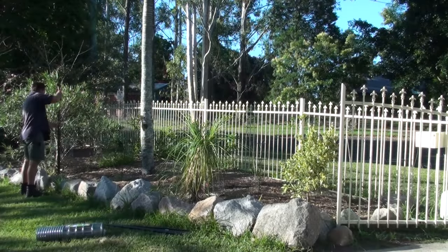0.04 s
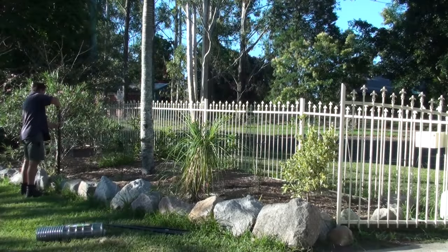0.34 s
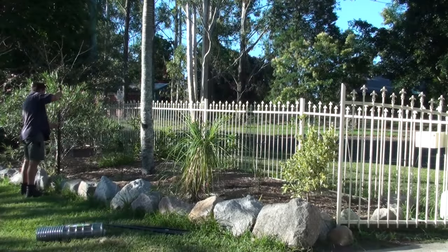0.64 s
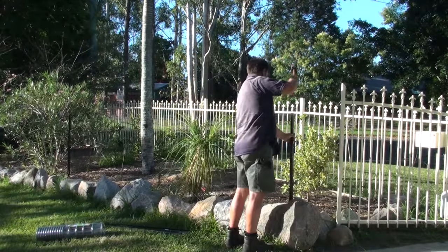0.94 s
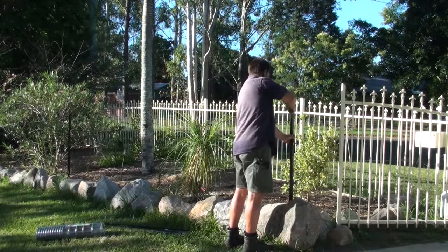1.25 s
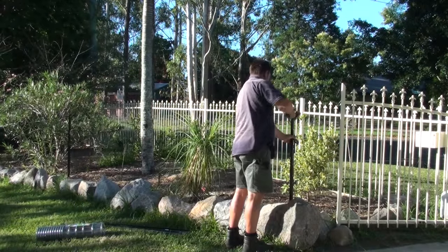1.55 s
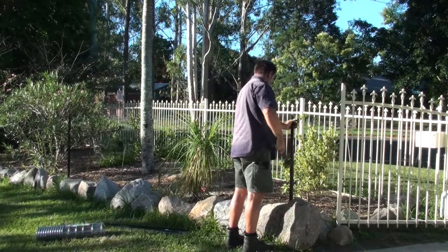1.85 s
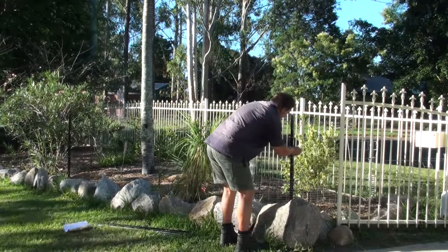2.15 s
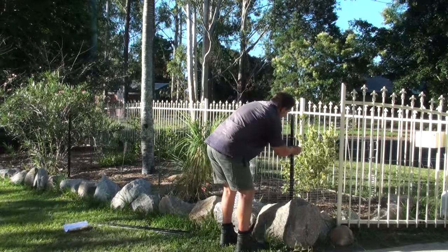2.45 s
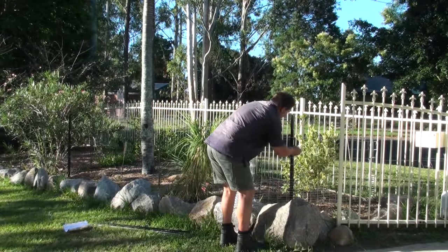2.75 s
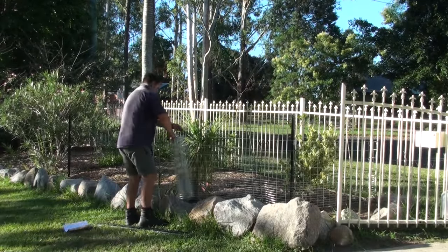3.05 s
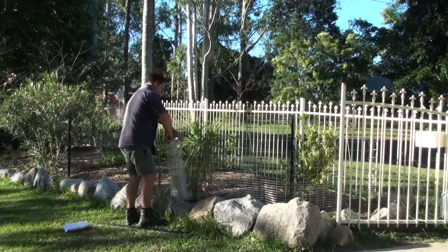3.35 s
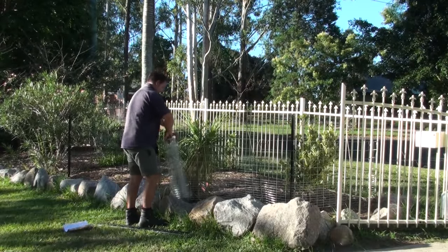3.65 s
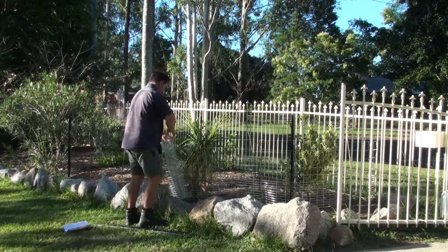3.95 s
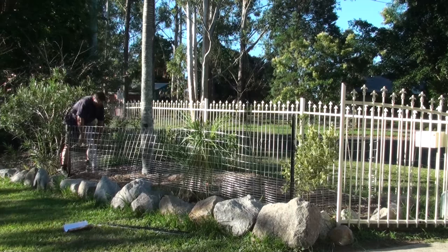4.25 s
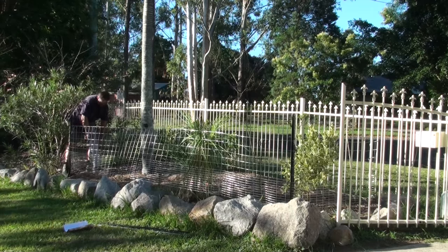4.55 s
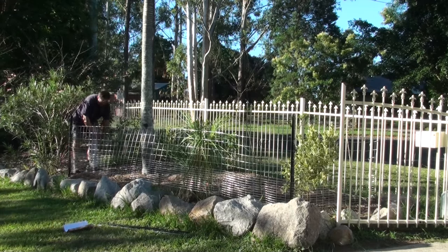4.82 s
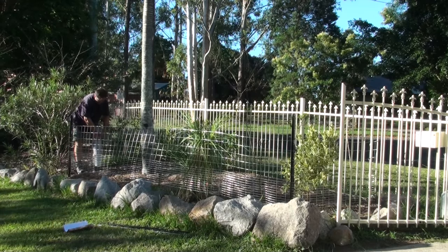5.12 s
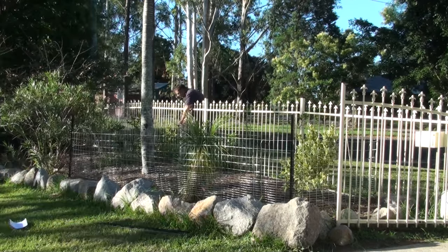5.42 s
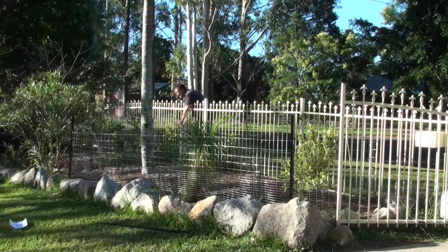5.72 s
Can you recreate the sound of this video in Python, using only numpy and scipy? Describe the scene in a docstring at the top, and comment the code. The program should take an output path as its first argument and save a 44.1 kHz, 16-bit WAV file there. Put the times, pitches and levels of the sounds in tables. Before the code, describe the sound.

A high, shrill insect buzz runs throughout in an open garden, over a soft hiss of distant leaves. After a dull scuff on the right, a far steel post takes one clanging blow at about 0.3 seconds. At 1.3 seconds a nearer post takes a louder blow, with a short ring, an echo and soft ground thuds. The buzz jumps louder near 1.9 seconds and shifts abruptly again around 2.9, 4.3 and 5.3 seconds. Faint birds call from the right, with whistles near 0.8 seconds and from 2.2 to 2.9, hoarse screeches around 3.3, and small twitters later. Between 3.8 and 5.3 seconds, wire mesh is unrolled in about five short, grainy swishes, the sharpest near 4.1. A breeze rumbles on the microphone from about 3.5 to 4.6 seconds, with low bumps that are strongest near 4.1 and 5.2 seconds.

```python
"""Two steel fence posts each take one clanging blow: impact excites their modes, the soil damps them,
and trees and railings scatter the sound back. The ground thuds after the near blow. Later, wire mesh
swishes by friction as it is unrolled. Insects buzz throughout, their level stepping between six short
garden scenes. Birds whistle and screech, distant leaves hiss, and a breeze bumps the microphone."""
import sys
import numpy as np
from scipy import signal
from scipy.fft import rfft, irfft, next_fast_len
from scipy.io import wavfile
from scipy.ndimage import map_coordinates

SR = 44100
rng = np.random.default_rng(int(sys.argv[2]) if len(sys.argv) > 2 else 0)


def to_wav(sig):
    """Store sig (one row per channel, or 1-D mono) as 16-bit WAV at the path in sys.argv[1].

    Samples outside -1..1 are clipped; the rate is SR.
    """
    pcm = np.clip(np.atleast_2d(sig), -1, 1) * 32767
    pcm = np.round(pcm).astype(np.int16)
    wavfile.write(sys.argv[1], SR, pcm.T)  # frames by channels


N = 259238

# steady levels of each scene: (start [s], far chorus [dB], nearby insects [dB], open air [dB])
SCENE_LEVELS = [(0, -39, -60, -43.5), (.823, -41.5, -64, -46.5), (1.943, -33.5, -29.5, -47),
                (2.876, -34.5, -27, -44.5), (4.261, -34.5, -34, -46), (5.265, -51, -28.5, -46)]
# diffuse field: (frequency [Hz], side minus mid [dB])
DIFFUSE_WIDTH = [(200, -5), (1000, -2), (2500, -2.5), (4500, 1), (7000, 0), (10000, -2.5)]
# reverberation of the garden: (frequency [Hz], time to fall 60 dB [s])
GARDEN_T60 = [(200, 0.42), (1500, 1), (3200, 0.87), (6000, 0.75), (10000, 0.58), (15000, 0.35)]
# noise spectra: (frequency [Hz], relative spectral density [dB])
AIR_SPECTRUM = [(20, -35), (60, -6), (150, -3.5), (400, -4), (800, -4), (1500, -5.5), (3000, -4.5),
                (5500, -10), (10000, -14), (12000, -21.5), (15000, -78)]
BREEZE_SPECTRUM = [(20, -6), (45, 0), (90, 0), (160, -4.5), (260, -14), (500, -25), (1000, -30),
                   (2000, -80)]
BUZZ_SPECTRUM = [(5000, -38.5), (6500, -32.5), (7100, -21.5), (7600, -11), (8200, -6), (8700, -7.5),
                 (9300, -14), (10000, -23.5), (11000, -29), (12500, -73)]
HIGH_HISS_SPECTRUM = [(10500, -27), (11700, 3.5), (12600, -1.5), (13700, -3.5), (15800, -24)]
WIRE_SPECTRUM = [(2000, -25), (5000, -8), (9000, -1), (12500, 0), (15500, -4)]
FAR_CRASH_SPECTRUM = [(200, -30), (650, -15.5), (1150, -14), (1550, -1), (2050, -5.5), (3300, -4.5),
                      (4500, 0.5), (7000, -3.5), (9000, -13), (13000, -11.5), (16000, -49)]
NEAR_CRASH_SPECTRUM = [(200, -18), (700, -20), (1300, -4), (1900, -2.5), (2300, 7.5), (4500, 5.5),
                       (5800, -3), (7300, 1), (10000, -7), (13000, -8.5), (16000, -23)]
# balance of the open air: (frequency [Hz], left minus right [dB])
AIR_PAN = [(150, -12.5), (500, -2.5), (1500, -1.5), (2800, -6), (7000, -5), (10000, 1)]
# strength of the breeze: (time [s], relative level [dB])
BREEZE_LEVELS = [(0.0, -53), (0.55, -51.5), (0.98, -55), (1.28, -51.5), (2.49, -54.5), (3.47, -44),
                 (3.76, -52.5), (3.93, -42), (4.09, -39.5), (4.27, -40.5), (4.4, -39.5), (4.55, -44),
                 (5.6, -56.5), (5.88, -53)]
# light air rumbles on the right, gusts reach both sides: (relative level [dB], left minus right [dB])
BREEZE_PAN = [(-57, -17), (-44.5, -4)]
# ground thuds after the near blow, and wind bumps: (time [s], level [dB], Gaussian width [s])
LOW_THUMPS = [(1.25, -39.5, .012), (1.3, -31.5, 0.0074), (1.36, -38.5, 0.013), (1.473, -34, .007),
              (1.734, -40, 0.011), (2.914, -39.5, 0.022), (3.148, -36, 0.0039), (3.272, -35.5, 0.01),
              (3.902, -34, 0.013), (4.102, -27, 0.0062), (4.238, -29, 0.015), (4.35, -34, 0.025),
              (5.135, -23, 0.0087), (5.199, -25, 0.026)]
# falling whistles and rising chips: (start [s], length [s], first pitch [Hz], relative level [dB])
FALLING_SLURS = [(0, 0.044, 2980, -51), (2.23, 0.15, 3170, -47.5), (2.254, 0.11, 3840, -41.5),
                 (2.319, 0.066, 4250, -52), (2.353, .059, 3600, -44.5), (2.408, 0.079, 2700, -51.5),
                 (3.97, .06, 3370, -51.5), (4.21, 0.052, 3030, -42.5), (4.231, .035, 3600, -45.5)]
RISING_CHIPS = [(5.409, 0.026, 1630, -47.5), (5.636, 0.018, 1520, -51)]
# arched whistles: (crest [s], rise [s], fall [s], top pitch [Hz], relative level [dB], overtone step [dB])
ARCHED_WHISTLES = [(.82, 0.049, 0.018, 3220, -46, -4), (.838, 0.013, 0.022, 3890, -41, -10),
                   (.868, .025, 0.0092, 3470, -45, -7), (.871, 0.01, 0.011, 4550, -39, -17),
                   (.932, 0.064, 0.08, 3660, -44.5, -4), (2.185, .045, .028, 6400, -55, -30),
                   (2.77, 0.078, 0.042, 3220, -47.5, -13), (2.765, .005, .04, 2645, -50.5, 0.5),
                   (2.835, .045, 0.036, 3510, -45, -24), (3.595, 0.063, 0.037, 4130, -52, -15),
                   (3.628, .04, .04, 3096, -48, -18)]
# calls on one pitch, mostly hoarse: (start [s], length [s], pitch [Hz], relative level [dB], rasp [0-1])
HELD_CALLS = [(1.72, 0.091, 820, -60.5, 0.06), (2.623, 0.064, 2250, -54, 0.86),
              (2.917, .11, 2700, -53.5, 0.75), (3.222, 0.15, 2442, -47.5, .8),
              (3.256, 0.14, 3700, -52, 0.92), (3.28, 0.98, 2116, -58, 0.38), (3.346, 0.19, 3120, -53, 0.12),
              (5.262, 0.1, 3250, -51.5, 0.58), (5.252, 0.16, 4150, -53.5, .6)]
# faint twittering: (start [s], length [s], centre pitch [Hz], relative level [dB])
TWITTER_SPELLS = [(3.477, .07, 3960, -52.5), (4.481, .075, 3820, -54), (5.48, .21, 4740, -54),
                  (5.658, .1, 3080, -57)]
# wires sliding over each other: (start [s], level [dB], time to fall 60 dB [s])
MESH_SLIDES = [(3.81, -36, 0.37), (4.113, -27, 0.11), (4.58, -43, .22), (4.68, -32.5, .3), (4.999, -40, .6)]
# contacts of steel on steel within one blow: (time [s], relative level [dB])
FAR_BLOW = [(.2833, -10.5), (.2865, -11), (.2955, -11.5), (.3835, -29), (.3915, -19.5)]
NEAR_BLOW = [(1.2822, -17.5), (1.2842, -7), (1.2864, -10), (1.2886, -16.5), (1.2902, -15.5), (1.2968, -13)]
# modes of each post with its driver: (frequency [Hz], relative level [dB])
FAR_MODES = [(1545, -5), (1613, 0), (1686, -4), (2200, -8), (2817, -4), (2896, 3), (3180, 0), (3428, 4),
             (3498, 2.5), (3688, 0), (4139, -4), (4215, -4), (4650, -5), (4741, -6), (5093, -7),
             (5437, -10), (5868, -10), (6498, -13), (7150, -10)]
NEAR_MODES = [(2170, -2), (2245, -2.5), (2488, -3.5), (2637, -2), (2840, -3), (3048, -5), (3139, 1),
              (3199, 0), (3521, -2), (3680, 0), (4152, -3), (4668, -1), (5118, -4), (6255, -11),
              (6643, -10), (7251, -.5), (7339, -1.5), (8979, -9)]
# scatter from railings, trunks and shrubs: (delay [s], relative level [dB], spread [s])
FAR_REFLECTIONS = [(.018, -4, 0.012), (.044, -4.5, 0.018), (.123, -17, 0.0075)]
NEAR_REFLECTIONS = [(.029, 0.1, 0.017), (.068, -1, 0.0071), (.134, -10, .009)]
# thin rails throw back mostly treble: (frequency [Hz], gain [dB])
RAIL_RESPONSE = [(1000, -4.5), (2300, -2.5), (3600, -1), (5000, 3), (8000, 1.5), (13000, 4.5)]


def amp(db):
    """Amplitude ratio of a level in decibels."""
    return 10 ** (np.asarray(db) / 20)


def unit(x):
    """Normalisation to rms 1."""
    return x / np.sqrt(np.mean(x ** 2) + 1e-20)


def along(points, hz):
    """Interpolation of (frequency [Hz], value) points on a logarithmic axis."""
    knots_hz, values = np.transpose(points)
    return np.interp(np.log(hz + 1), np.log(knots_hz + 1), values)


def seconds(length):
    """Time axis of a short sound, at least 5 ms long."""
    return np.arange(int(max(length, .005) * SR)) / SR


def wobble(rate, size=N):
    """Smooth random modulation, with rate knots a second."""
    knots = rng.standard_normal(int(size * rate / SR) + 4)
    return map_coordinates(knots, [np.arange(size) * rate / SR])


def filtered(x, response):
    """Linear filtering: the spectrum is multiplied by a frequency response."""
    size = x.shape[-1]
    padded = next_fast_len(size + 8192)
    return irfft(rfft(x, padded) * response(np.fft.rfftfreq(padded, 1 / SR)), padded)[..., :size]


def noise(spectrum, size=N):
    """Spectral shaping of white noise, at rms 1."""
    return unit(filtered(rng.standard_normal(size), lambda hz: amp(along(spectrum, hz))))


def wide_noise(spectrum, coherence, phase_rad=0):
    """Partial coherence: two microphone ports share one noise, phase apart, and each adds its own."""
    phase_shift = np.exp(.5j * phase_rad * np.array([[1], [-1]]))
    shared = np.real(signal.hilbert(noise(spectrum)) * phase_shift)
    separate = np.array([noise(spectrum), noise(spectrum)])
    return np.sqrt(coherence) * shared + np.sqrt(1 - coherence) * separate


def panned(pan_db):
    """Constant-power gains for a level difference, left minus right."""
    gains = amp(np.array([[.5], [-.5]]) * pan_db)
    return gains / np.sqrt(np.mean(gains ** 2, axis=0))


def add(track, s, sound):
    """Superposition of a sound on a track at time s."""
    start = int(np.clip(round(s * SR), 0, N - 1))
    track[..., start:start + sound.shape[-1]] += sound[..., :N - start]


def scene_index():
    """Number of the scene at each sample."""
    return np.searchsorted([row[0] for row in SCENE_LEVELS[1:]], np.arange(N) / SR)


def scene_levels():
    """Step functions of level for the chorus, the nearby insects and the air."""
    return np.array(SCENE_LEVELS)[scene_index(), 1:].T


def diffuse(pair):
    """A diffuse field at two close ports: alike in the bass, slightly opposed near 4.5 kHz."""
    mid, side = filtered(pair, lambda hz: panned(-along(DIFFUSE_WIDTH, hz)))
    return np.array([mid + side, mid - side]) / np.sqrt(2)


def garden(x, tail_db, echoes, coherence):
    """Reverberation by convolution: a decaying diffuse tail plus partly coherent clusters of echoes."""
    t = np.arange(SR) / SR
    hz, frame_s, spectra = signal.stft(diffuse(rng.standard_normal((2, SR))), SR, nperseg=256)
    decay = amp(-60 * frame_s / along(GARDEN_T60, hz)[:, None])
    tail = signal.istft(spectra * decay, SR, nperseg=256)[1][:, :SR]
    response = amp(tail_db) * unit(tail * (1 - np.exp(-t / .047)))
    for delay, db, spread in echoes:
        shared = np.sqrt(coherence) * rng.standard_normal(SR)
        scatter = shared + np.sqrt(1 - coherence) * diffuse(rng.standard_normal((2, SR)))
        response += amp(db) * unit(scatter * np.exp(-.5 * ((t - delay) / spread) ** 2))
    return signal.fftconvolve(x[None], response / np.sqrt(SR), axes=1)[:, :N]


def air():
    """Distant leaves and open air form a diffuse field whose level drifts slowly."""
    *_, air_db = scene_levels()
    hush = diffuse(np.array([noise(AIR_SPECTRUM), noise(AIR_SPECTRUM)]))
    return amp(air_db + .86 * wobble(2.17)) * filtered(hush, lambda hz: panned(along(AIR_PAN, hz)))


def high_hiss():
    """Band-limited noise: a thin high hiss in the right channel, following the insects' level."""
    chorus_db, nearby_db, _ = scene_levels()
    gain = np.hypot(amp(chorus_db - 21), amp(nearby_db - 25))
    return gain * wide_noise(HIGH_HISS_SPECTRUM, coherence=0) * panned(-87)


def breeze():
    """Turbulence buffets the microphone, spreading from the right to both sides as it grows."""
    db = np.interp(np.arange(N) / SR, *np.transpose(BREEZE_LEVELS))
    pan_db = np.interp(db, *np.transpose(BREEZE_PAN))
    buffet = unit(wide_noise(BREEZE_SPECTRUM, coherence=.38) * amp(1.65 * wobble(25)))
    return amp(db + 4) * panned(pan_db) * buffet


def puff(s, db, width_s, top_hz, pan_db):
    """Band-limited noise under a Gaussian envelope centred on time s, half shared by the ports."""
    def band(hz):
        return hz ** 2 / (hz ** 2 + (.36 * top_hz) ** 2) / (1 + (hz / top_hz) ** 4)

    out, t = np.zeros((2, N)), np.arange(SR // 5) / SR - .1
    low = filtered(rng.standard_normal((3, len(t))), band)
    swell = np.exp(-.5 * (t / width_s) ** 2)
    add(out, s + t[0], amp(db) * panned(pan_db) * unit(low[:2] + low[2]) * swell)
    return out


def thumps():
    """Low-frequency transients: the ground thuds after the near blow, and wind bumps the microphone."""
    return sum(puff(*thump, top_hz=204, pan_db=.5) for thump in LOW_THUMPS)


def insects():
    """Many insects sum to narrow-band noise; the nearby ones flutter, coherent from one direction."""
    chorus_db, nearby_db, _ = scene_levels()
    chorus = amp(chorus_db) * wide_noise(BUZZ_SPECTRUM, coherence=.34) * panned(-3.5)
    flutter = unit(amp(.6 * wobble(170) + .19 * wobble(23)))
    song = wide_noise(BUZZ_SPECTRUM, coherence=.9, phase_rad=-2.25)
    return chorus + amp(nearby_db) * flutter * song * panned(-.9)


def note(pitch, db, overtone_db, rasp, harmonics=2):
    """A bird's harmonic note swells and fades; fast random frequency modulation makes it rasp."""
    size = len(pitch)
    waver = .01 * wobble(70, size) + .13 * rasp * wobble(900, size)
    phase = 2 * np.pi * np.cumsum(pitch * (1 + waver)) / SR
    tone = sum(amp(overtone_db * k) * np.sin((k + 1) * phase) for k in range(harmonics))
    swell = np.abs(np.sin(np.linspace(0, np.pi, size))) ** .5 * amp(2.2 * wobble(110, size))
    return amp(db) * np.sqrt(2) * tone * swell


def whistles():
    """Frequency sweeps: on an octave scale, slurs and chips follow lines and arches follow parabolas."""
    fall_octaves_per_s, rise_octaves_per_s, bend_octaves_per_s2 = 7.4, 15, 80
    out = np.zeros(N)
    for s, length, hz, db in FALLING_SLURS:
        pitch = hz * 2 ** (-fall_octaves_per_s * seconds(length))
        add(out, s, note(pitch, db, overtone_db=-22, rasp=.27))
    for s, length, hz, db in RISING_CHIPS:
        pitch = hz * 2 ** (rise_octaves_per_s * seconds(length))
        add(out, s, note(pitch, db, overtone_db=1, rasp=.064, harmonics=3))
    for s, rise, fall, hz, db, overtone_db in ARCHED_WHISTLES:
        from_crest = seconds(rise + fall) - rise
        pitch = hz * 2 ** (-bend_octaves_per_s2 * from_crest ** 2)
        add(out, s - rise, note(pitch, db, overtone_db, rasp=.11))
    return out


def chatter():
    """Frequency modulation roughens held calls into screeches; tiny tweets glide up or down at random."""
    tweets_per_s, tweet_s, spread_octaves, glide_octaves_per_s = 130, .0124, .158, 9
    out = np.zeros(N)
    for s, length, hz, db, rasp in HELD_CALLS:
        add(out, s, note(np.full_like(seconds(length), hz), db, overtone_db=-4.5, rasp=rasp))
    from_middle = seconds(tweet_s) - tweet_s / 2
    for s, length, hz, db in TWITTER_SPELLS:
        delays = np.arange(0, length, 1 / tweets_per_s)
        for delay, (offset, glide) in zip(delays, rng.standard_normal((64, 2))):
            octaves = spread_octaves * offset + glide_octaves_per_s * glide * from_middle
            add(out, s + delay, note(hz * 2 ** octaves, db, overtone_db=-20, rasp=.25))
    return out


def birds():
    """Birds call from the right; scattering by the trees smears each note until its scene ends."""
    calls, current = whistles() + chatter(), scene_index()
    trunks = [(.025, -7, .019)]  # (delay [s], relative level [dB], spread [s])
    trees = np.zeros((2, N))
    for k in range(len(SCENE_LEVELS)):
        within = current == k
        trees += garden(calls * within, tail_db=-4.5, echoes=trunks, coherence=.2) * within
    return amp(4) * calls * panned(-9.5) + trees * panned(-5.5)


def mesh():
    """Friction between sliding wires gives short, grainy swishes that decay exponentially."""
    out, t = np.zeros(N), np.arange(SR // 2) / SR
    for s, db, t60 in MESH_SLIDES:
        grains = unit(noise(WIRE_SPECTRUM, len(t)) * amp(3 * wobble(700, len(t))))
        attack = 1 - np.exp(-t / (.06 * t60))
        add(out, s, amp(db - 60 * t / t60) * grains * attack)
    return out * panned(-6)


def scuff():
    """A burst of low noise is heard as a dull scuff on the right, just before the first blow."""
    return puff(s=.147, db=-39, width_s=.026, top_hz=820, pan_db=-18)


def post(contacts, modes, crash_spectrum, crash_db, crash_t60, clank_db, clank_t60, ring_db, ring_t60):
    """Impact excites a noisy crash and a modal clank that the soil soon damps, and a weak long ring."""
    blow, ring, t = np.zeros(N), np.zeros(N), np.arange(SR) / SR
    hz, mode_db = np.transpose(modes)
    attack = 1 - np.exp(-t / .00033)
    for s, db in contacts:
        strengths = amp(mode_db + rng.normal(0, 1.2, len(hz)))
        phases = 2 * np.pi * (hz[:, None] * t + rng.random((len(hz), 1)))
        tones = unit(strengths @ np.sin(phases))
        clank = tones * amp(clank_db - 60 * t / clank_t60)
        crash = noise(crash_spectrum, SR) * amp(crash_db - 60 * t / crash_t60)
        add(blow, s, amp(db) * (clank + crash) * attack)
        add(ring, s, tones * amp(db + ring_db - 60 * t / ring_t60))
    return blow, ring


def posts():
    """Direct sound and reflections of one blow on a far post, then one on a near post."""
    far, far_ring = post(FAR_BLOW, FAR_MODES, FAR_CRASH_SPECTRUM, crash_db=0, crash_t60=.029,
                         clank_db=3, clank_t60=.028, ring_db=-24, ring_t60=.65)
    near, near_ring = post(NEAR_BLOW, NEAR_MODES, NEAR_CRASH_SPECTRUM, crash_db=5.5, crash_t60=.01,
                           clank_db=-4, clank_t60=.029, ring_db=-19, ring_t60=.55)
    direct = (far + far_ring) * panned(-3) + (near + near_ring) * panned(-5)
    echoes = garden(far, tail_db=-6.5, echoes=FAR_REFLECTIONS, coherence=.3)
    echoes += garden(near, tail_db=-1, echoes=NEAR_REFLECTIONS, coherence=.061)
    return direct + filtered(echoes, lambda hz: amp(along(RAIL_RESPONSE, hz))) * panned(-5.5)


def scene():
    """Superposition of all sources; the level dips briefly between scenes."""
    dip_db, dip_half_width_s = -12, .0036
    t = np.arange(N) / SR
    dips = sum(np.exp(-((t - start) / dip_half_width_s) ** 2) for start, *_ in SCENE_LEVELS[1:])
    mix = posts() + scuff() + insects() + high_hiss() + birds() + breeze() + thumps() + mesh() + air()
    return amp(dip_db * dips) * mix


def record(dry):
    """Soft saturation rounds the loudest peaks, and a band limit removes the highest treble."""
    top_hz = 15800
    rounded = dry / (1 + np.abs(dry) ** 6) ** (1 / 6)
    return filtered(rounded, lambda hz: hz < top_hz)


dry = scene()
out = record(dry)
to_wav(out)
```